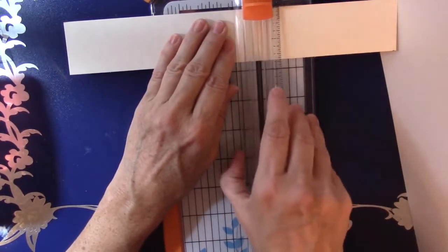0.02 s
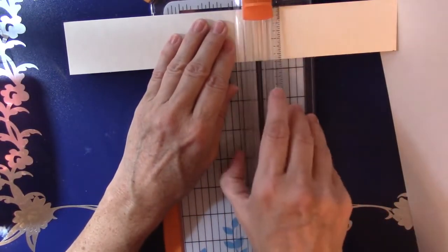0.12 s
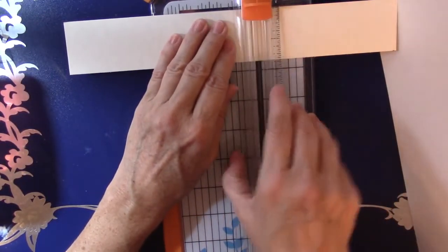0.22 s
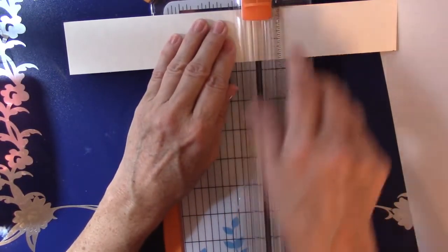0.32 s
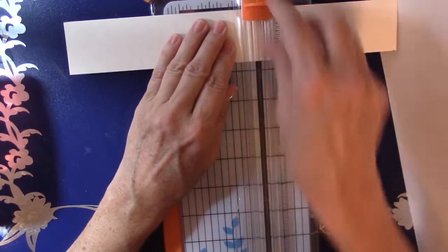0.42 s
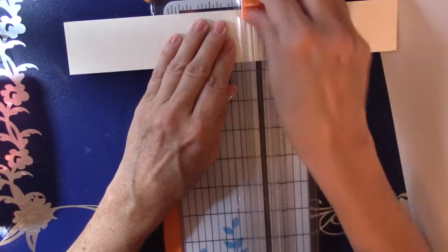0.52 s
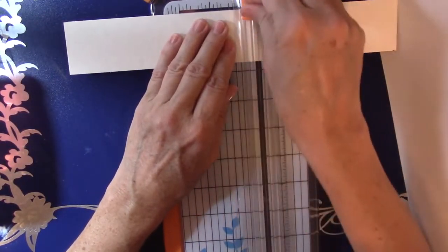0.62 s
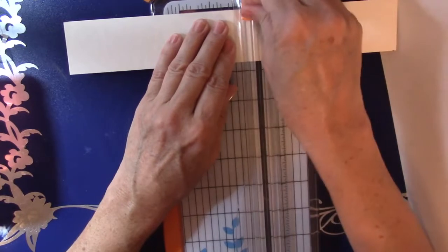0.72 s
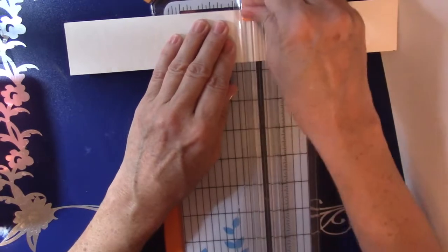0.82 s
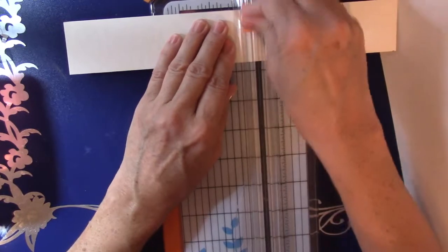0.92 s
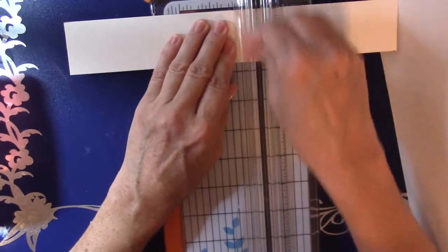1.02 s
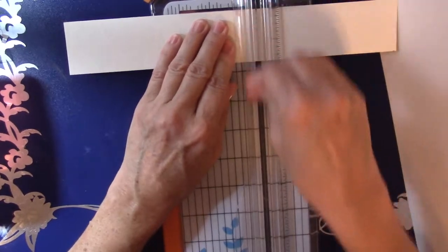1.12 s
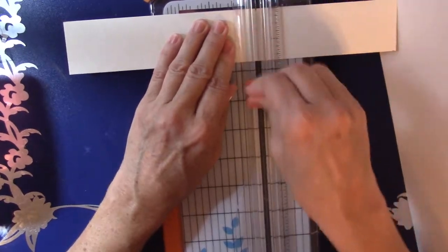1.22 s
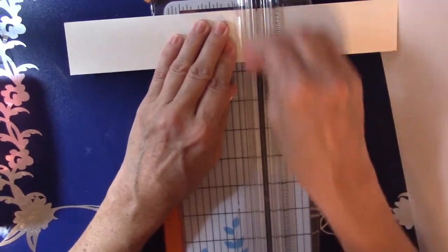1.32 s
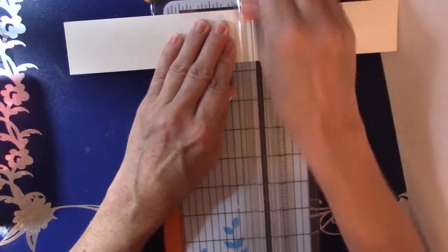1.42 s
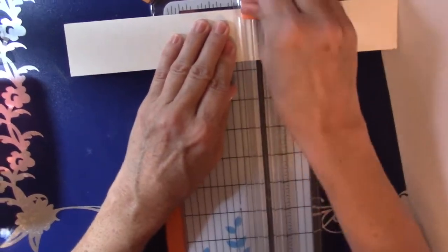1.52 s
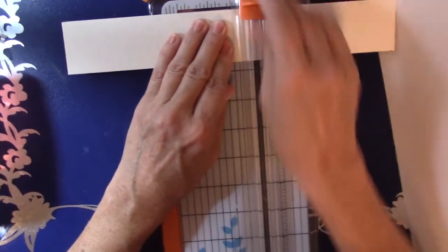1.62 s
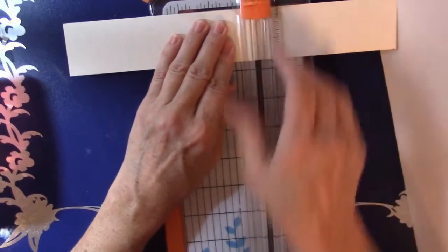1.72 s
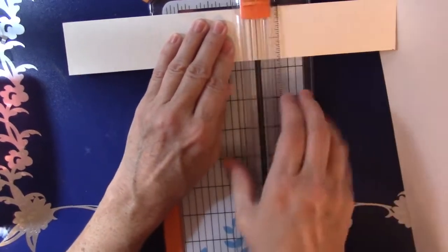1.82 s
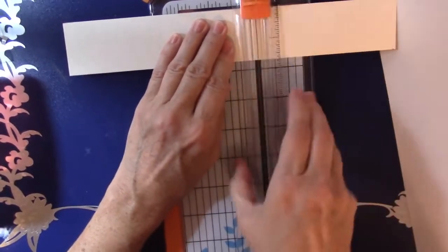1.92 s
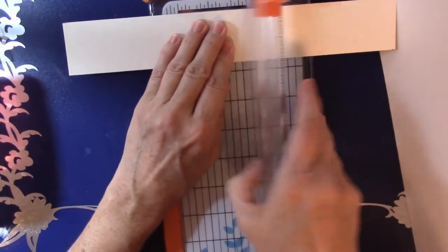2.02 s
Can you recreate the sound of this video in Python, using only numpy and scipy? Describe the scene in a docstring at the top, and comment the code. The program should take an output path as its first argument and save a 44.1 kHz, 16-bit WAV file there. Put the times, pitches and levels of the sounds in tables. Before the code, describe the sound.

Paper trimmer on a table, close and nearly mono: chattering plastic clack, small taps, a quick dense rasping cut, a scraping return ending in a bright snap, then light handling and a faint click over low room hush.

```python
"""A sliding paper trimmer on a table, close by and nearly mono in a small room with a faint steady hush.
After a dull tap, the plastic guide rail drops and chatters: cracks of noise over damped modes.
A finger takes the slider with a knock and draws its blade through a paper strip: dense fibre snaps and judder.
The slider glides back as resonant friction, snaps against its end stop and rattles.
Fingers then tap and brush the base as soft pulses and rubbed noise, and the rail clicks lightly again."""
import sys
import numpy as np
from scipy import signal
from scipy.fft import rfft, irfft, next_fast_len
from scipy.io import wavfile
from scipy.ndimage import map_coordinates

SR = 44100
rng = np.random.default_rng(int(sys.argv[2]) if len(sys.argv) > 2 else 0)


def to_wav(s):
    """Save 16-bit WAV."""
    ch = np.atleast_2d(s).T  # columns
    pcm = np.round(np.clip(ch, -1, 1) * 32767)  # PCM
    wavfile.write(sys.argv[1], SR, pcm.astype(np.int16))


N = 92610
T = np.arange(N) / SR
RING_T = T[:SR // 3]  # time axis of one struck sound [s]

# Blade in the paper: (time [s], level [dB])
CUT_LEVEL = [(.855, -39.5), (.859, -55), (.862, -33.5), (.869, -40.5), (.876, -30), (.882, -39.5),
             (.888, -33.5), (.905, -33.5), (.947, -30), (.985, -31.5), (1.02, -29.5), (1.068, -29),
             (1.076, -53), (1.095, -61), (1.12, -76.5)]
# Tone of the parting fibres: (frequency [Hz], level [dB])
CUT_COLOUR = [(30, -47.5), (60, -47), (110, -4), (150, 6), (260, -9), (450, 2.5), (560, -7.5), (780, 2),
              (900, -11), (1200, -8.5), (1550, 2.5), (2050, -6), (2400, -10), (3600, -12.5), (5300, -12),
              (7600, -14), (10000, -17.5), (13000, -27.5), (16000, -48)]
# Tone of the blade's judder in the base: (frequency [Hz], level [dB])
JUDDER_COLOUR = [(60, -39.5), (200, 1), (330, -2.5), (440, 5.5), (560, -5), (780, 7), (950, -6),
                 (2000, -7.5), (6000, -25.5), (16000, -43)]
# Slider's place: (time [s], place [share of the cut's length])
TRAVEL = [(.855, 0.24), (1.07, 1.23), (1.2, 0.76), (1.425, 0.27)]
# Slider and rail resonances under friction:
# (frequency [Hz], glide over the cut [Hz], width [Hz], lift [dB])
SLIDER_PEAKS = [(1536, -170, 110, 4.5), (1877, 204.5, 90, 8.5), (2700, 321.5, 280, 6.5),
                (3710, -100, 110, 13), (4200, -120, 93, 5), (5030, 299, 230, 6.5), (7200, 198.5, 290, 5)]
# Slider rubbing along its rail: (time [s], level [dB])
GLIDE_LEVEL = [(.68, -98), (.74, -72), (.8, -72), (.835, -61.5), (.856, -55), (1.08, -49), (1.135, -48),
               (1.19, -74), (1.222, -58), (1.245, -50), (1.275, -49.5), (1.336, -43), (1.405, -45.5),
               (1.43, -103.5), (1.5, -92)]
# Tone of that rubbing: (frequency [Hz], level [dB])
GLIDE_COLOUR = [(35, -62), (60, -27), (140, 2), (200, -11.5), (300, -20.5), (450, -3.5), (840, -5.5),
                (1500, -7), (1860, -4), (2770, -12), (5200, -9.5), (6400, -5.5), (11800, -15.5),
                (16000, -34)]
# Slider knocks when pressed, at the ends of its travel and settling:
# (time [s], crack [dB], dull above [Hz], ring [dB])
STOP_HITS = [(.5535, -29.5, 9000, -44), (1.2023, -25, 2013, -42.5), (1.4251, -7.5, 13900, -33),
             (1.4407, -23, 13600, -41.5), (1.521, -46, 1700, -53), (1.529, -32.5, 1990, -54.5),
             (1.619, -43.5, 2590, -58.5)]
# Tone of a slider crack: (frequency [Hz], level [dB])
STOP_CRACK_COLOUR = [(60, -30.5), (200, -19), (500, -7.5), (1400, 0), (2700, -6), (4200, 0.5), (5500, 0.5),
                     (7500, -4), (9500, -8.5), (12500, -15.5), (16000, -31)]
# Decay of a slider crack: (frequency [Hz], t60 [s])
STOP_CRACK_T60 = [(300, 0.11), (1500, 0.032), (5000, 0.022), (14000, 0.012)]
# Modes of base and slider: (frequency [Hz], level [dB], t60 [s])
BASE_MODES = [(430, 1, .1), (538, 1, 0.11), (734, 6, 0.11), (900, 6, 0.07), (1030, 6, 0.06),
              (1120, 0, 0.05), (1410, 1, 0.075), (1600, 0, 0.03), (1760, 2, 0.045), (2180, 0, 0.03),
              (4200, -5, 0.025), (5250, 0, 0.025)]
# Guide rail striking the base: (time [s], ring [dB], crack [dB], ring length [share of the modes' t60])
RAIL_HITS = [(0.2017, -21, -15, 0.79), (0.2074, -30.5, -20, 0.8), (0.2148, -32, -17, 0.61),
             (0.2212, -19, -17, 0.81), (0.2319, -26, -23.5, 1), (.238, -25, -27, 0.8),
             (0.262, -26.5, -31.5, 0.94), (0.2717, -33, -35.5, 0.81), (0.3228, -38, -41, 0.66),
             (1.7832, -38.5, -42.5, 0.26), (1.804, -52, -66, 0.93)]
# Modes of the rail: (frequency [Hz], level [dB], t60 [s])
RAIL_MODES = [(340, -17, 0.13), (449, -12, .09), (815, -6, 0.045), (908, -3, 0.085), (965, 1, 0.05),
              (1014, 2.5, 0.075), (1300, -7.5, 0.06), (1430, -2, 0.08), (1480, 0.5, 0.06),
              (1575, -5.5, 0.045), (1826, -7.5, 0.04), (2040, -8, .06), (2616, -6.5, 0.055)]
# Tone of a rail crack: (frequency [Hz], level [dB])
RAIL_CRACK_COLOUR = [(60, -24.5), (140, -4.5), (250, -8), (500, -3), (1000, -8), (1600, -0.5), (2800, 0.5),
                     (4500, 6), (7300, 1.5), (9000, -11.5), (12500, -15.5), (14200, -41), (16000, -44.5)]
# Decay of a rail crack: (frequency [Hz], t60 [s])
RAIL_CRACK_T60 = [(300, 0.19), (1500, 0.086), (6000, 0.0095), (14000, 0.04)]
# Dull knocks of fingers and slider on plastic: (time [s], level [dB], dull above [Hz])
TAPS = [(0.0302, -48.5, 1770), (0.5431, -38.5, 1390), (.555, -31, 2450), (0.7672, -37, 1120),
        (1.066, -25.5, 1090), (1.204, -33.5, 1094), (1.803, -37, 1020)]
# Tone of a dull knock: (frequency [Hz], level [dB])
TAP_COLOUR = [(60, -36.5), (160, -6.5), (300, -5.5), (450, 2), (680, -2.5), (1000, 0), (2000, -6.5),
              (6000, -13.5), (16000, -39)]
# Decay of a dull knock: (frequency [Hz], t60 [s])
TAP_T60 = [(200, 0.065), (800, 0.069), (4000, 0.058)]
# Small sharp ticks of the slider's play: (time [s], level [dB])
TICKS = [(0.6427, -39.5), (1.7845, -45)]
# Tone of a tick: (frequency [Hz], level [dB])
TICK_COLOUR = [(100, -15), (1000, -11), (2000, 4), (3300, -7), (6000, -6.5), (11000, -11), (16000, -36)]
# Decay of a tick: (frequency [Hz], t60 [s])
TICK_T60 = [(500, 0.016), (10000, 0.015)]
# Table giving under the hand: (time [s], level [dB], frequency [Hz])
THUMPS = [(0.205, -30.5, 145), (0.559, -39.5, 146), (1.074, -28.5, 118), (1.163, -35, 134),
          (1.427, -27, 112.4), (1.529, -37, 138.5), (1.786, -31, 136.3)]
# Soft fingertips on the hollow base: (time [s], level [dB], t60 [s])
PADS = [(.768, -37, 0.084), (1.9732, -39.5, 0.25)]
# Tone of a fingertip: (frequency [Hz], level [dB])
PAD_COLOUR = [(60, -26.5), (160, -7), (250, -3.5), (350, -3), (480, -5), (630, 4), (760, -4.5), (900, -15),
              (1300, -18.5), (2200, -30), (16000, -66)]
# Hand brushing over plastic and paper: (time [s], level [dB])
BRUSH_LEVEL = [(1.48, -85), (1.52, -61), (1.555, -46.5), (1.59, -72), (1.76, -78), (1.82, -54),
               (1.865, -64.5), (1.897, -49), (1.93, -67.5), (1.97, -68), (2.02, -56), (2.06, -51),
               (2.1, -50)]
# Tone of the brushing: (frequency [Hz], level [dB])
BRUSH_COLOUR = [(60, -24), (200, 5), (400, -9), (800, 3.5), (1300, -5), (2200, -13.5), (4500, -14.5),
                (7200, -11.5), (9000, -14), (11500, -24), (16000, -50.5)]
# Nearby desk reflections, unlike left and right: (frequency [Hz], level [dB])
DESK_SIDE = [(150, -22.5), (1000, -25.5), (2500, -22), (6000, -15), (12000, -19.5)]
# Decay of the desk reflections: (frequency [Hz], t60 [s])
DESK_T60 = [(200, 0.019), (8000, .016)]
# Decay of the room: (frequency [Hz], t60 [s])
ROOM_T60 = [(120, 0.62), (500, 0.44), (1100, 0.24), (2600, 0.22), (5000, 0.21), (8000, 0.15),
            (13000, 0.091)]
# Width of the room's reflections: (frequency [Hz], side over mid [gain ratio])
ROOM_WIDTH = [(200, 0.087), (900, .09), (3000, 0.15), (7500, 0.34)]
# Tone of the room's hush: (frequency [Hz], level [dB])
HUSH_COLOUR = [(25, -49.5), (60, -21.5), (92, -12.5), (150, -8.5), (200, -9.5), (250, -3.5), (330, -9.5),
               (490, -13.5), (650, -13.5), (1000, -11), (1300, -19.5), (1850, -17.5), (2600, -22),
               (4000, -24), (7300, -30), (8500, -40), (10000, -47.5), (16000, -73)]

FIBRES_PER_S, FIBRE_SPREAD_DB = 5500, 0.5
CUT_ROUGH_DB, CUT_ROUGH_PER_S = 0.54, 130
# the blade catching and slipping; jitter is the spread of the rate's natural log
JUDDER_PER_S, JUDDER_JITTER, JUDDER_DB = 210, 0.25, -9
PATCH_HZ, PATCH_S = 272, 0.04014  # size of the patches in which the friction's colour shifts
# the slider shaking in its play after a stop
RATTLE_DB, RATTLE_GAP_S, RATTLE_LOSS_DB_PER_S, RATTLE_DULL_HZ = -15, 0.008, 297.5, 1400
# how modes differ between contacts, and how far their pitch blurs
SCATTER_DB, MODE_SHIFT_SHARE, RING_BLUR_HZ = 1.5, 0.011, 9
THUMP_T60_S, THUMP_RISE_S = 0.07, 0.0034
DESK_DELAY_S = 0.00102
ROOM_DB, ROOM_DELAY_S = -15, 0.005
HUSH_DB, HUSH_WIDTH = -59.5, 0.41  # width is side over mid
LOW_CUT_HZ, TOP_HZ = 83, 16500


def cut():
    """The blade parts thousands of fibres a second and judders unevenly, which shakes the base."""
    happens = rng.random(N) < FIBRES_PER_S / SR
    strength = amp(FIBRE_SPREAD_DB * rng.standard_normal(N))
    snaps = happens * rng.choice([-1, 1], N) * strength
    rough = snaps * amp(CUT_ROUGH_DB * wobble(CUT_ROUGH_PER_S))
    fibres = travelling(coloured(rough, CUT_COLOUR), patchy_db=3)
    slip_rate = JUDDER_PER_S * np.exp(JUDDER_JITTER * wobble(JUDDER_PER_S))
    turns = np.cumsum(slip_rate) / SR
    slips = np.diff(np.floor(turns), prepend=0)  # one click per whole turn
    judder = amp(JUDDER_DB) * unit(coloured(slips, JUDDER_COLOUR))
    return level(CUT_LEVEL) * (fibres + judder)


def glide():
    """The slider rubs along its rail, heard through resonances that follow its place."""
    friction = rub(GLIDE_COLOUR, rough_db=1.2, rate=340)
    return level(GLIDE_LEVEL) * travelling(friction, patchy_db=1.5)


def end_stops():
    """The slider knocks with a crack and a short ring of the base; after the hardest blow it rattles."""
    def crack(dull_hz):
        return coloured(dying(STOP_CRACK_T60), STOP_CRACK_COLOUR, dull_hz)

    knocks = placed((s, amp(crack_db) * crack(dull_hz) + amp(ring_db) * ring(BASE_MODES))
                    for s, crack_db, dull_hz, ring_db in STOP_HITS)
    start, blow_db, *_ = max(STOP_HITS, key=lambda hit: hit[1])
    lags = RATTLE_GAP_S * np.cumsum(0.5 + rng.random(size=8))
    rattle_db = blow_db + RATTLE_DB - RATTLE_LOSS_DB_PER_S * lags
    rattle = placed((start + lag, amp(db) * crack(RATTLE_DULL_HZ)) for lag, db in zip(lags, rattle_db))
    return knocks + rattle


def rail():
    """Each contact of the rail cracks and rings its modes, with its own damping."""
    hits = []
    for s, ring_db, crack_db, length in RAIL_HITS:
        crack = coloured(dying(RAIL_CRACK_T60), RAIL_CRACK_COLOUR)
        hits.append((s, amp(ring_db) * ring(RAIL_MODES, length) + amp(crack_db) * crack))
    return placed(hits)


def taps():
    """Fingers and slider knock the plastic: noise bursts with softened treble."""
    return placed((s, amp(db) * coloured(dying(TAP_T60), TAP_COLOUR, dull_hz)) for s, db, dull_hz in TAPS)


def ticks():
    """The slider's play gives very short, sharp noise bursts."""
    return placed((s, amp(db) * coloured(dying(TICK_T60), TICK_COLOUR)) for s, db in TICKS)


def thumps():
    """The table gives under the hand: low damped sines with a soft rise."""
    swell = fade(THUMP_T60_S) * (1 - np.exp(-RING_T / THUMP_RISE_S))
    return placed((s, amp(db) * swell * np.sin(2 * np.pi * hz * RING_T)) for s, db, hz in THUMPS)


def fingertips():
    """Soft fingertips on the hollow base: fading grain of random-sign pulses, each with its own decay."""
    pads = []
    for s, db, t60 in PADS:
        grain = rng.choice([-1, 1], len(RING_T))
        pads.append((s, amp(db) * fade(t60) * unit(coloured(grain, PAD_COLOUR))))
    return placed(pads)


def brush():
    """The hand brushes over plastic and paper as rough, swelling friction noise."""
    return level(BRUSH_LEVEL) * rub(BRUSH_COLOUR, rough_db=1.2, rate=190)


def rub(colour, rough_db, rate):
    """Fine friction with a slightly uneven grip."""
    grip = amp(rough_db * wobble(rate))
    return unit(coloured(rng.standard_normal(N) * grip, colour))


def travelling(x, patchy_db):
    """Friction heard through the slider's resonances, which glide as the contact moves along."""
    hz, t, z = signal.stft(x, SR, nperseg=512)
    knots = np.meshgrid(hz / PATCH_HZ, t / PATCH_S, indexing="ij")
    drift = map_coordinates(rng.standard_normal(size=(128, 128)), knots, mode="wrap")
    place = np.interp(t, *np.transpose(TRAVEL))
    lift = 0
    for centre, shift, width, db in SLIDER_PEAKS:
        offset = hz[:, None] - centre - shift * place
        lift = lift + db / (1 + (2 * offset / width) ** 2)
    return unit(signal.istft(z * amp(lift + patchy_db * drift), SR, nperseg=512)[1][:N])


def ring(modes, length=1):
    """Damped modes of loose plastic that differ from blow to blow and waver; length scales their decay."""
    out = np.zeros(len(RING_T))
    for hz, db, t60 in modes:
        side, strength, shift = rng.standard_normal(3)
        steps = rng.standard_normal(len(RING_T))
        waver = np.cumsum(steps) * np.sqrt(2 * np.pi * RING_BLUR_HZ / SR)  # random walk of phase
        tone = np.sin(2 * np.pi * hz * (1 + MODE_SHIFT_SHARE * shift) * RING_T + waver)
        onset = 1 - np.exp(-RING_T * hz)
        out += np.sign(side) * amp(db + SCATTER_DB * strength) * fade(t60 * length) * onset * tone
    return out


def dying(t60s):
    """Noise that starts flat and dies at its own speed in each of nine overlapping bands."""
    hz = np.fft.rfftfreq(len(RING_T), 1 / SR)
    flat = np.exp(2j * np.pi * rng.random(len(hz))) * np.sqrt(len(RING_T))
    centres = np.geomspace(100, 16000, 9)
    out = np.zeros(len(RING_T))
    for centre, row in zip(centres, np.eye(len(centres))):
        band = np.interp(np.log(hz + 1), np.log(centres), row)
        out += irfft(flat * band, len(RING_T)) * fade(along(t60s, centre))
    return out


def fade(t60):
    """Exponential decay by 60 dB in t60 seconds."""
    return np.exp(-np.log(1000) * RING_T / t60)


def coloured(x, points, dull_hz=1e6):
    """Causal minimum-phase filter, set to unit power and then dulled above dull_hz."""
    m = 2 * next_fast_len(x.shape[-1] + 4096)
    hz = np.fft.rfftfreq(m, 1 / SR)
    gain = unit(amp(along(points, hz))) / np.hypot(1, (hz / dull_hz) ** 2)
    # folding the cepstrum forward in time makes the filter causal
    cep = irfft(np.log(gain + 1e-6))
    cep[1:m // 2] *= 2
    cep[m // 2 + 1:] = 0
    return irfft(rfft(x, m) * np.exp(rfft(cep)), m)[..., :x.shape[-1]]


def filtered(x, response):
    """Weight the spectrum of x by a function of frequency, leaving phase alone."""
    m = next_fast_len(N + SR // 2)
    return irfft(rfft(x, m) * response(np.fft.rfftfreq(m, 1 / SR)), m)[..., :N]


def placed(sounds):
    """Sum (time [s], sound) pairs on the time line."""
    out = np.zeros(N + SR)
    for s, sound in sounds:
        out[round(s * SR):][:len(sound)] += sound
    return out[:N]


def level(rows):
    """Gain per sample from (time [s], level [dB]) points."""
    return amp(np.interp(T, *np.transpose(rows), left=-120))


def wobble(rate):
    """A smooth random curve, rate knots a second."""
    return map_coordinates(rng.standard_normal(int(N * rate / SR) + 4), [T * rate])


def along(points, hz):
    """Read (frequency [Hz], value) points on a log axis."""
    f, v = np.transpose(points)
    return np.interp(np.log(hz + 1), np.log(f + 1), v)


def unit(x):
    """Scale to rms 1."""
    return x / np.sqrt(np.mean(x ** 2) + 1e-20)


def amp(db):
    """Decibels to gain."""
    return 10 ** (np.asarray(db) / 20)


def reflected(x, t60s, delay_s):
    """Diffuse reflections: x smeared by a delayed noise tail of unit energy."""
    tail = dying(t60s)
    return signal.fftconvolve(x, placed([(delay_s, tail / np.linalg.norm(tail))]))[:N]


def room_hush():
    """Two independent layers of steady coloured noise, for mid and side."""
    return amp(HUSH_DB) * unit(coloured(rng.standard_normal((2, N)), HUSH_COLOUR))


def scene():
    """The trimmer sits in the middle; desk and room reflections and the hush add a little width."""
    slider = cut() + glide() + end_stops()
    hand = taps() + ticks() + thumps() + fingertips() + brush()
    trimmer = slider + rail() + hand
    desk = reflected(trimmer, DESK_T60, DESK_DELAY_S)
    desk_side = filtered(desk, lambda hz: amp(along(DESK_SIDE, hz)))
    room = [amp(ROOM_DB) * reflected(trimmer, ROOM_T60, ROOM_DELAY_S) for _ in range(2)]
    room_side = filtered(room[1], lambda hz: along(ROOM_WIDTH, hz))
    hush = room_hush()
    mid = trimmer + room[0] + hush[0]
    side = desk_side + room_side + HUSH_WIDTH * hush[1]
    return np.array([mid + side, mid - side])


def record(dry):
    """Thin the deep bass with a gentle high-pass and keep nothing above the band limit."""
    high_pass = signal.butter(2, LOW_CUT_HZ, "high", fs=SR, output="sos")
    thinned = signal.sosfilt(high_pass, dry)
    return filtered(thinned, lambda hz: hz < TOP_HZ)


dry = scene()
out = record(dry)
to_wav(out)
```